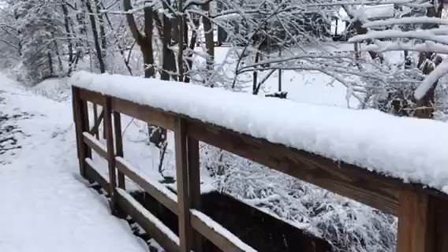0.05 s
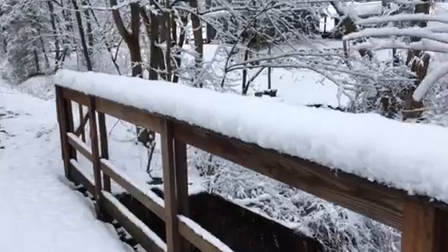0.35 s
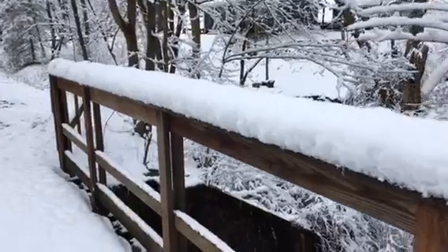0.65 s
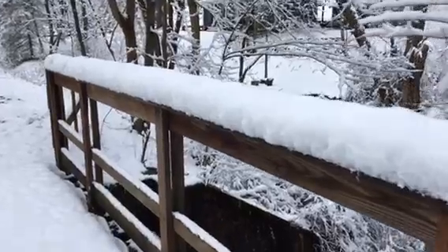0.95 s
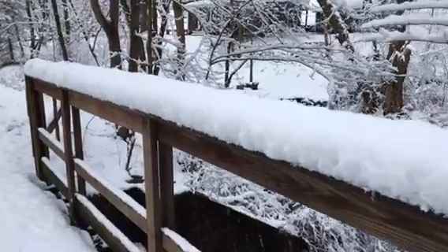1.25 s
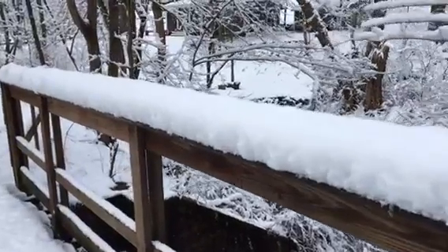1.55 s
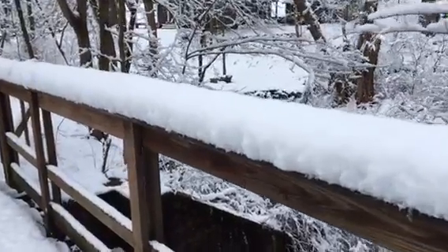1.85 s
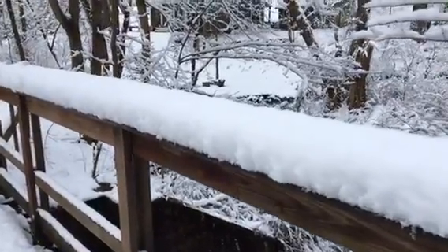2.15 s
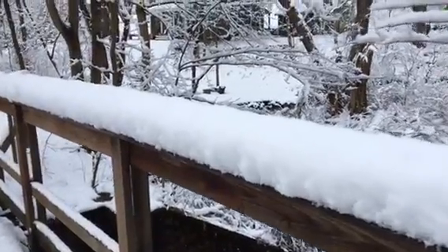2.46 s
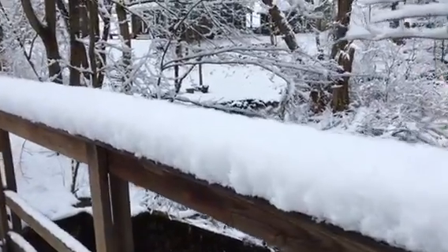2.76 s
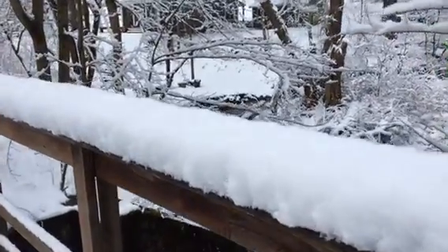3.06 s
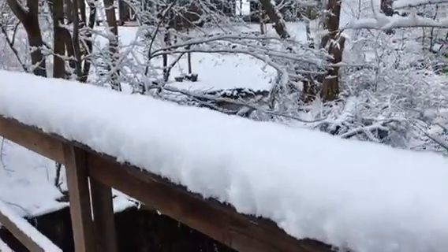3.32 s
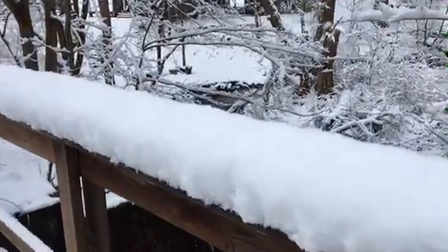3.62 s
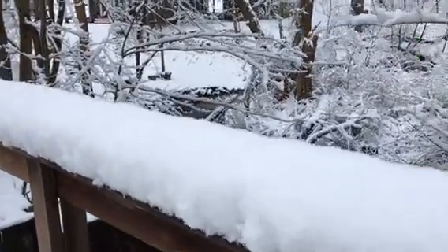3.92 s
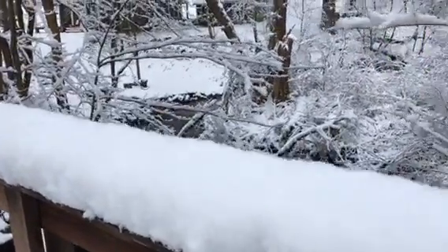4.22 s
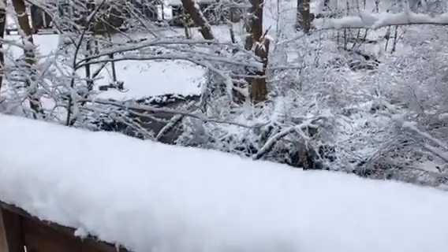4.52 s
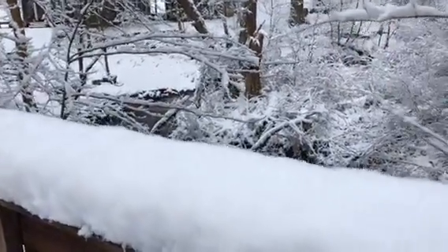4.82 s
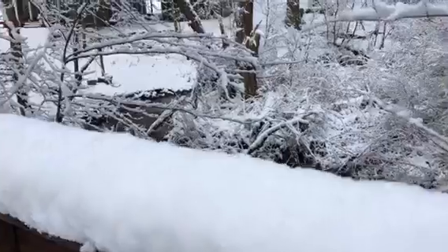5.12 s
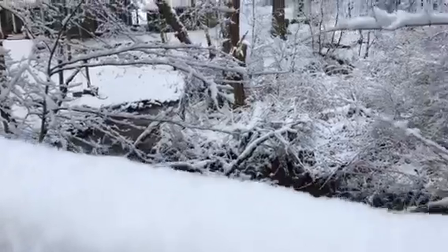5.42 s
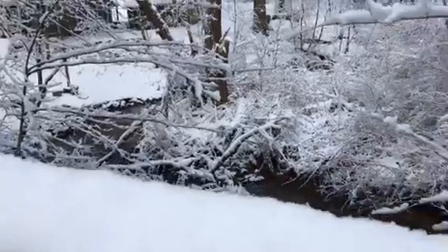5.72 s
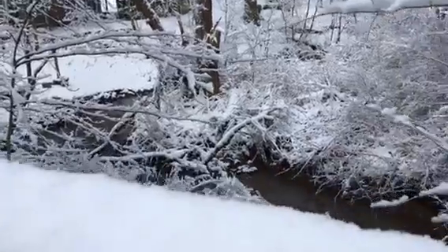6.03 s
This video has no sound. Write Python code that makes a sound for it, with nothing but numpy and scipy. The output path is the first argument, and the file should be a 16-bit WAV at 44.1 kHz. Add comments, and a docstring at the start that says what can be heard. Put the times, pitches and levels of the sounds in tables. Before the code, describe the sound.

Close, muffled thumps and creaks of packed snow under shifting feet, with distant birds whistling and twittering in quiet woods.

```python
"""A snow-covered wooden footbridge in quiet woods, where someone shifts their weight.
Packed snow gives way underfoot in small slips. Each rings snow and deck in a soft, dull thump;
quick runs of slips merge into a low creak. Clothing brushes faintly. A bird ends a series of
falling whistles and small birds twitter far off, echoed by the trunks. A creek murmurs behind."""
import sys
import numpy as np
from scipy import signal
from scipy.fft import rfft, irfft
from scipy.io import wavfile

SR = 44100
rng = np.random.default_rng(int(sys.argv[2]) if len(sys.argv) > 2 else 0)


def unload_wav(signal):
    """Save mono or channel-first audio to the path in sys.argv[1] as 16-bit WAV at rate SR, clipped to [-1, 1]."""
    wavfile.write(
        sys.argv[1],
        SR,
        np.round(np.clip(np.atleast_2d(signal).T, -1, 1) * 32767).astype(np.int16),
    )


N = 272538
TIME = np.arange(N) / SR


def from_db(db):
    """Decibels to gain."""
    return 10 ** (np.asarray(db) / 20)


def peak_one(x):
    """Scale to peak 1."""
    return x / (np.abs(x).max() + 1e-20)


def add(out, start_s, sound):
    """Mix a sound in at start_s."""
    at = int(round(start_s * SR))
    sound, at = sound[max(-at, 0):], max(at, 0)
    out[at:at + len(sound)] += sound[:max(N - at, 0)]


def coloured(x, spectrum):
    """Filter by a curve of (f/Hz, level/dB); rms 1."""
    hz, db = np.transpose(spectrum)
    bins_hz = np.maximum(np.fft.rfftfreq(N, 1 / SR), 1)
    gain = from_db(np.interp(np.log(bins_hz), np.log(hz), db))
    shaped = irfft(rfft(x) * gain, N)
    return shaped / np.sqrt(np.mean(shaped ** 2) + 1e-20)


def drift(knots_per_s):
    """Random wander, spread about 1."""
    knots = rng.standard_normal(4000)
    return np.interp(TIME * knots_per_s, np.arange(len(knots)), knots)


def ring(push, hz, t60_s):
    """Damped resonance; a unit click gives a peak of about 1."""
    radius = from_db(-60 / (t60_s * SR))
    angle = 2 * np.pi * min(hz, SR / 2.2) / SR
    return signal.lfilter([0, np.sin(angle)], [1, -2 * radius * np.cos(angle), radius ** 2], push + 1e-18)


def aftermath(shakes, t60_s, attack_s=.003):
    """Envelope that rises with each shake and dies away."""
    lag = np.exp(-1 / (attack_s * SR))
    power = signal.lfilter([1], [1, -from_db(-60 / (t60_s * SR)) ** 2], shakes ** 2 + 1e-18)
    return signal.lfilter([1 - lag], [1, -lag], np.sqrt(power))


# steady spectrum of creek, air and hiss: f/Hz, relative level/dB
AIR_SPECTRUM = [(13, -20), (22, 5.5), (42, 0), (70, -0.5), (110, -2.5), (250, -7), (450, -3), (780, -2),
                (1250, -12), (2000, -16), (4000, -23), (7200, -24.5), (12000, -25), (15500, -29)]


def air(level_db=-63, whine_hz=10207, whine_db=-94):
    """Steady air and hiss with a very faint electronic whine."""
    hiss = from_db(level_db) * coloured(rng.standard_normal(N), AIR_SPECTRUM)
    return hiss + from_db(whine_db) * np.sqrt(2) * np.sin(2 * np.pi * whine_hz * TIME)


def creek(level_db=-73.5, ripple_db=3.5, swell_db=5.0):
    """Water murmurs in quick ripples and slow swells."""
    spectrum = [(200, -15.5), (450, -4.5), (750, -7.5), (1200, -11), (2500, -27.5), (6000, -32)]
    level = from_db(level_db + ripple_db * drift(30) + swell_db * drift(1.4))
    return level * coloured(rng.standard_normal(N), spectrum)


def woods(call, echo_s, echo_db, near_db, far_db, near_t60_s=.068, far_t60_s=.62):
    """Nearby trunks echo and blur a call; a thin tail returns from deeper in the trees."""
    t = TIME[:SR]
    response = np.zeros(SR)
    for db, t60_s in (near_db, near_t60_s), (far_db, far_t60_s):
        scatter = rng.standard_normal(SR) * from_db(-60 * t / t60_s) * (1 - np.exp(-t / .012))
        response += from_db(db) * scatter / np.linalg.norm(scatter)
    response[int(echo_s * SR)] += from_db(echo_db)
    return call + signal.fftconvolve(call, response)[:N]


def note(hz, db, waver=.0096):
    """Bird tone along a pitch contour, trembling in pitch and level."""
    tremble = drift(250)[:len(hz)]
    level = from_db(db + 2 * tremble) * signal.windows.tukey(len(hz), .35)
    return level * np.sin(2 * np.pi * np.cumsum(hz * (1 + waver * tremble)) / SR)


def arch(length_s, pitches_hz):
    """Parabolic contour through a first, middle and last pitch."""
    parabola = np.polyfit([0, .5, 1], pitches_hz, 2)
    return np.polyval(parabola, np.linspace(0, 1, int(length_s * SR)))


# far calls: t/s, length/s, first f/Hz, middle f/Hz, last f/Hz, level/dB
LONE_NOTES = [(0.44, 0.16, 2280, 1967, 1700, -75), (4.22, 0.051, 7250, 7430, 7620, -70),
              (4.83, 0.18, 4520, 4450, 4670, -82.5), (5.044, 0.046, 2370, 2320, 2300, -70),
              (5.113, .11, 2306, 2285, 2310, -76), (5.174, 0.077, 2300, 2950, 2427, -77.5),
              (5.653, 0.07, 2270, 3120, 2400, -77.5)]


def lone_notes():
    """Far birds give single gliding notes."""
    out = np.zeros(N)
    for start_s, length_s, *pitches_hz, db in LONE_NOTES:
        add(out, start_s, note(arch(length_s, pitches_hz), db))
    return out


# phrases: t/s, length/s, top f/Hz, level/dB
TWITTERS = [(0.947, 0.099, 7800, -79), (1.073, .13, 8000, -75.5), (1.263, 0.095, 8110, -68.5),
            (1.424, 0.13, 8020, -72)]


def twitter(hold_s=.034, sag_hz_per_s=1900, warble_hz=28, depth_hz=542):
    """Each phrase holds a high, sagging note, then warbles below it."""
    out = np.zeros(N)
    for start_s, length_s, top_hz, db in TWITTERS:
        t = TIME[:int(length_s * SR)]
        dips = np.sin(np.pi * warble_hz * np.maximum(t - hold_s, 0)) ** 2
        add(out, start_s, note(top_hz - sag_hz_per_s * t - depth_hz * dips, db, waver=.0083))
    return out


# chips of the trill: t/s, level/dB
CHIPS = [(4.83, -71.5), (4.918, -76), (5.014, -77), (5.094, -71), (5.171, -71.5), (5.249, -72.5),
         (5.326, -70.5), (5.407, -74), (5.492, -77)]


def trill(chip_s=.024, first_hz=7200, rise_hz=790, sag_hz_per_s=910):
    """Quick upward chips, each a little lower than the last."""
    out = np.zeros(N)
    sweep_hz = rise_hz * np.linspace(-.5, .5, int(chip_s * SR))
    for start_s, db in CHIPS:
        centre_hz = first_hz - sag_hz_per_s * (start_s - CHIPS[0][0])
        add(out, start_s, note(centre_hz + sweep_hz, db))
    return out


# rising lead-in note: first, middle, last f/Hz
PICKUP_HZ = (1810, 2150, 2240)
# one whistle: t/s from its start, f/Hz, relative level/dB
WHISTLE_CONTOUR = [(0, 7210, -20), (.009, 5130, -13), (.033, 4510, -16), (.058, 3930, -0.5),
                   (0.065, 3400, 2), (0.073, 2690, -4), (.084, 2440, -6), (.097, 2450, -8)]
# the series: t/s, level/dB
WHISTLES = [(-.056, -52), (0.14, -53), (0.345, -53.5)]


def whistles(pickup_lead_s=.043, pickup_s=.025, pickup_rel_db=-7):
    """After a short rising note, a pure tone sweeps down, lingers, then drops again."""
    out = np.zeros(N)
    knots_s, pitch_hz, level_db = np.transpose(WHISTLE_CONTOUR)
    t = TIME[:int(knots_s[-1] * SR)]
    phase = 2 * np.pi * np.cumsum(np.interp(t, knots_s, pitch_hz)) / SR
    envelope = from_db(np.interp(t, knots_s, level_db)) * signal.windows.tukey(len(t), .1)
    for start_s, db in WHISTLES:
        pickup = note(arch(pickup_s, PICKUP_HZ), db + pickup_rel_db, waver=.0043)
        add(out, start_s - pickup_lead_s, pickup)
        add(out, start_s, from_db(db) * envelope * np.sin(phase))
    return out


# brushes of clothing: centre t/s, half length/s, level/dB
BRUSHES = [(.02, .14, -76), (2.487, 0.14, -73.5), (2.774, 0.11, -76), (3.408, 0.066, -78),
           (4.0, 0.13, -74.5)]


def clothing(grains_per_s=700, flutter_db=3):
    """Fibres catch and let go in a soft crackle that swells with each brush."""
    grains = (rng.random(N) < grains_per_s / SR) * rng.standard_normal(N)
    flutter = from_db(flutter_db * drift(70))
    spectrum = [(800, -29), (2500, 2), (5000, -4), (9000, -3), (12500, -7), (15500, -23)]
    level = sum(from_db(db) * np.exp(-((TIME - at_s) / half_s) ** 2) for at_s, half_s, db in BRUSHES)
    return level * flutter * coloured(grains, spectrum)


# dry ticks: t/s, peak level/dB, f/Hz
TICKS = [(1.144, -44, 1270), (1.163, -63, 1490), (1.352, -62, 2600), (1.362, -56, 1870),
         (1.82, -54.5, 3500), (2.535, -60, 7000), (3.179, -54, 2980), (3.186, -51, 2430),
         (3.28, -61, 11000), (4.082, -57, 9970)]


def crystal_ticks(t60_s=.042):
    """Snow crystals tick in tiny bright bursts of noise."""
    out, t = np.zeros(N), TIME[:SR // 20]
    for start_s, db, hz in TICKS:
        burst = rng.standard_normal(len(t)) * from_db(-60 * t / t60_s)
        add(out, start_s, from_db(db) * peak_one(ring(burst, hz, t60_s=8 / hz)))
    return out


# rumble: t/s, level/dB re the thumps
RUMBLE_LEVEL = [(0, -23.5), (.5, -20), (1.6, -23), (2.7, -24), (3.2, -26.5), (4.1, -25), (4.5, -29),
                (5.1, -44), (5.85, -56), (6.05, -27)]


def rumble(shakes, t60_s=.32):
    """A soft, deep swell follows each slip."""
    spectrum = [(15, -33), (35, -9.5), (60, 7), (80, -3), (125, -3), (200, -27.5), (500, -66)]
    level = from_db(np.interp(TIME, *np.transpose(RUMBLE_LEVEL))) * aftermath(shakes, t60_s)
    return level * coloured(rng.standard_normal(N), spectrum)


# shifts of weight: start t/s, end t/s, level/dB
WEIGHT_SHIFTS = [(0, 0.22, -52), (0.45, 0.677, -57), (1.125, 1.47, -58), (1.81, 2.343, -58),
                 (2.553, 2.86, -61.5), (3.367, 3.6, -66), (3.88, 4.148, -59), (5.372, 6.18, -59.5)]
# settling snow: f/Hz, relative level/dB
SETTLING_SPECTRUM = [(50, -37), (110, -8), (200, 0.5), (380, -9), (700, -17.5), (1200, -35.5),
                     (2500, -46.5)]


def settling(shakes, grains_per_s=500, spread_db=5.0, fade_db_per_s=194, slip_rel_db=-23, t60_s=.3):
    """Countless tiny collapses mutter while the weight shifts and just after each slip."""
    grains = (rng.random(N) < grains_per_s / SR) * rng.choice([-1, 1], N)
    sizes = from_db(spread_db * np.minimum(rng.exponential(1, N), 3))
    load = sum(from_db(db - fade_db_per_s * np.abs(TIME - np.clip(TIME, start_s, end_s)))
               for start_s, end_s, db in WEIGHT_SHIFTS)
    after_slips = from_db(slip_rel_db) * aftermath(shakes, t60_s)
    return np.hypot(load, after_slips) * coloured(grains * sizes, SETTLING_SPECTRUM)


# collapses: t/s, thump level/dB, crunch level/dB re thump, second stage level/dB re first
COLLAPSES = [(.114, -38.5, -7, 5.5), (0.4436, -35, 0, 0), (0.496, -36.5, -5.5, -19),
             (.657, -40.5, -4, -1.5), (1.294, -40.5, -8.5, 2), (1.352, -36.5, -1, 0),
             (1.5625, -32, -1, 4.5), (1.654, -34.5, -4, -14), (1.933, -33.5, -7, -10),
             (2.584, -41, -2.5, 4), (3.005, -40, -7, -1.5), (3.176, -30.5, -2.5, 5.5),
             (3.419, -37, -4, -11), (4.248, -34, -7.5, -2.5), (4.473, -27, -5, -2.5),
             (5.377, -30, -18, -5.5), (6.129, -30, -7, -3)]


def collapse_slips(stage_s=.0103, dulling_db=4.5, last_drop_db=10.5):
    """Snow gives way in three stages, each duller; returns rows as in SINGLE_SLIPS."""
    slips = []
    for start_s, db, crunch_db, second_db in COLLAPSES:
        for k, stage_db in enumerate([0, second_db, second_db - last_drop_db]):
            slips.append((start_s + k * stage_s, db + stage_db, crunch_db - k * dulling_db))
    return slips


# creaks: start t/s, end t/s, thump level/dB, crunch level/dB re thump
CREAKS = [(.002, .085, -39, -11.5), (.135, .184, -53, -12), (.226, .261, -46.5, -24),
          (.468, .533, -46, -17), (1.132, 1.215, -46, -2), (1.868, 1.919, -42.5, -7),
          (1.956, 2.001, -38, -8.5), (2.66, 2.716, -36, -6.5), (3.919, 3.995, -45, -29),
          (4.004, 4.053, -42.5, 1.5), (5.322, 5.365, -42, -7), (5.419, 5.497, -33, -7)]


def creak_slips(slips_per_s=105, gap_scatter=.1088, scatter_db=1.5):
    """Snow sticks and slips in quick, nearly even runs; returns rows as in SINGLE_SLIPS."""
    slips = []
    for start_s, end_s, db, crunch_db in CREAKS:
        gap_noise, level_noise = rng.standard_normal((2, 24))
        times_s = start_s + np.cumsum(np.r_[0, np.exp(gap_scatter * gap_noise[1:])]) / slips_per_s
        levels_db = db + scatter_db * level_noise
        slips += [(at_s, thump_db, crunch_db) for at_s, thump_db in zip(times_s, levels_db) if at_s < end_s]
    return slips


# modes of snow and deck: ratio to ring pitch, relative level/dB, t60/s
THUMP_MODES = [(.62, -5, 0.073), (1.0, 9, 0.041), (1.75, -13, 0.052)]
# modes of the crunch: f/Hz, relative level/dB, t60/s
CRUNCH_MODES = [(417, -1.5, 0.06), (469.5, -5, 0.048), (599, -2.5, 0.03), (854, -4.5, 0.018),
                (1250, -8, 0.0056), (2500, -23.5, 0.0047)]


def slip(thump_db, ring_hz, crunch_db, fracture_s=.004, fracture_size=.32, scatter_db=2.17):
    """One break and six smaller fractures just after it set snow and deck ringing."""
    push = np.zeros(SR // 8)
    delays_s = np.minimum(rng.exponential(fracture_s, size=6), .05)
    np.add.at(push, (delays_s * SR).astype(int), fracture_size * rng.standard_normal(6))
    push[0] += 1
    thump = crunch = 0
    for k, (ratio, db, t60_s) in enumerate(THUMP_MODES):
        gain = (-1) ** k * from_db(db + scatter_db * rng.normal())
        thump += gain * ring(push, ring_hz * ratio, t60_s)
    for k, (hz, db, t60_s) in enumerate(CRUNCH_MODES):
        gain = (-1) ** k * from_db(db + scatter_db * rng.normal())
        crunch += gain * ring(push, hz * np.exp(.096 * rng.normal()), t60_s)
    return from_db(thump_db) * (peak_one(thump) + from_db(crunch_db) * peak_one(crunch))


# single slips: t/s, thump level/dB, crunch level/dB re thump
SINGLE_SLIPS = [(.013, -35.5, -7), (.037, -31.5, -6.5), (.065, -34, -3.5), (.186, -36, -11), (.203, -44, 1),
                (.2145, -28.5, -2.5), (.537, -40.5, -3.5), (.561, -36, -11), (.596, -34, -11.5),
                (1.085, -40.5, -5), (1.196, -45, -8), (1.243, -45.5, 0), (1.462, -44, -14),
                (1.62, -40.5, -3.5), (1.757, -41, -6), (1.806, -36.5, -12), (1.856, -38.5, -14),
                (2.013, -36.5, -7), (2.072, -32.5, -5), (2.146, -37, -2.5), (2.214, -37.5, -3.5),
                (2.258, -35, -17), (2.294, -42, -8), (2.329, -33.5, -13.5), (2.633, -52, -11),
                (2.727, -37.5, 0), (2.841, -36, -6), (2.901, -40.5, -5), (2.932, -40.5, -8.5),
                (3.707, -38, -31), (3.864, -42.5, -5), (3.909, -38.5, -8), (3.944, -38, -6),
                (4.085, -37, -9), (4.123, -37, -10), (4.166, -36.5, -23), (4.204, -46.5, -10),
                (4.324, -36.5, -7.5), (4.369, -45, -4), (4.415, -34.5, -15), (5.093, -32, -16),
                (5.226, -33, -11.5), (5.463, -42, -18), (5.501, -30.5, -7.5), (5.741, -37.5, -7),
                (5.784, -41.5, -4), (5.834, -36, -10), (5.877, -43, 0), (5.998, -45, 11),
                (6.0085, -21.5, -6.5)]
# pitch of snow and deck as the weight moves: t/s, f/Hz
RING_PITCH = [(0, 221), (.25, 214), (.66, 151.5), (1.35, 135), (2.3, 148), (3.1, 170.4), (4.4, 184),
              (5.1, 204), (5.5, 232.5), (6.18, 226.5)]
# hum of the deck: f/Hz, level/dB re thump, t60/s
DECK_MODES = [(171.5, -16.5, 0.21), (218.2, -23, 0.35), (358.8, -23, 0.24)]


def snow_underfoot(pitch_scatter=.061, muffle_band_hz=(90, 4500)):
    """Slips thump and the deck hums on, muffled by soft snow; returns the sound and the shakes."""
    thumps, shakes = np.zeros(N), np.zeros(N)
    for at_s, db, crunch_db in list(SINGLE_SLIPS) + collapse_slips() + creak_slips():
        ring_hz = np.interp(at_s, *np.transpose(RING_PITCH)) * np.exp(pitch_scatter * rng.normal())
        add(thumps, at_s, slip(db, ring_hz, crunch_db))
        add(shakes, at_s, from_db([db]))
    deck = sum(from_db(db) * ring(shakes, hz, t60_s) for hz, db, t60_s in DECK_MODES)
    muffle = signal.butter(2, muffle_band_hz, "band", fs=SR, output="sos")
    return signal.sosfilt(muffle, thumps + deck), shakes


def scene():
    """Quiet air and water, birds among the trees, snow close by; mono."""
    quiet = air() + creek() + clothing()
    whistler = woods(whistles(), echo_s=.017, echo_db=-20, near_db=-9, far_db=-9.5)
    far_birds = woods(twitter() + trill() + lone_notes(), echo_s=.036, echo_db=-4.5, near_db=-5, far_db=-4)
    thumps, shakes = snow_underfoot()
    snow = thumps + settling(shakes) + rumble(shakes) + crystal_ticks()
    return (quiet + whistler + far_birds + snow)[None]


def record(dry):
    """Steep low-pass on the top treble."""
    cutoff_hz = 15650
    return signal.sosfilt(signal.ellip(14, .1, 80, cutoff_hz, fs=SR, output="sos"), dry)


dry = scene()
out = record(dry)
unload_wav(out)
```